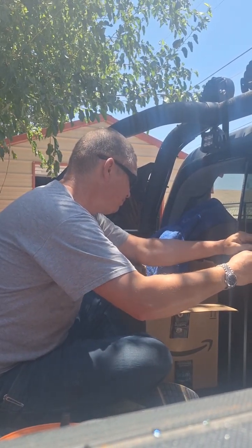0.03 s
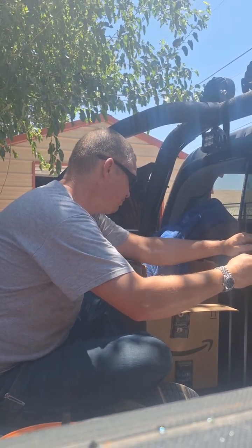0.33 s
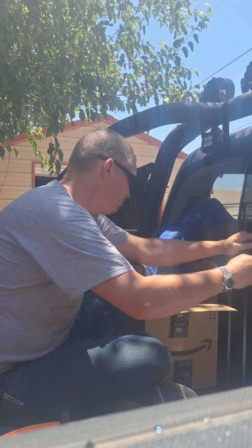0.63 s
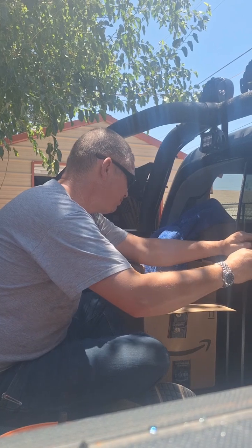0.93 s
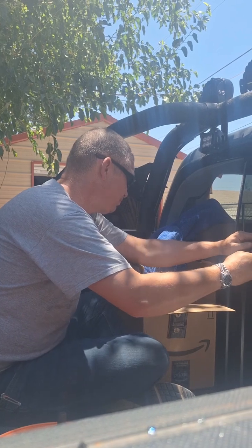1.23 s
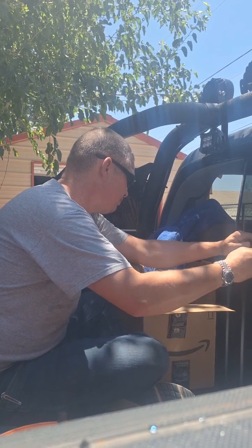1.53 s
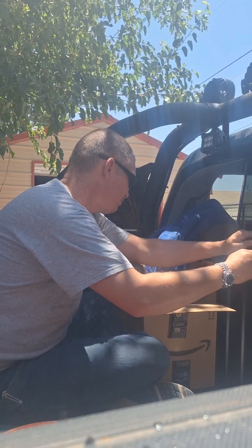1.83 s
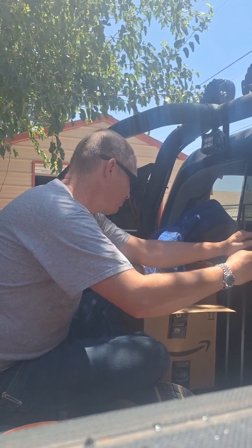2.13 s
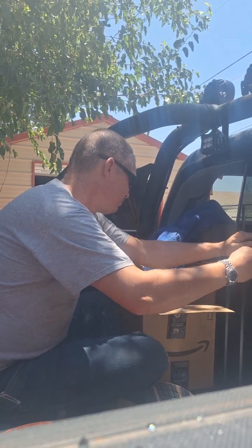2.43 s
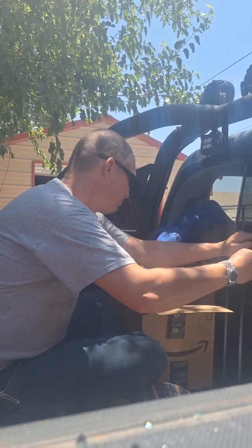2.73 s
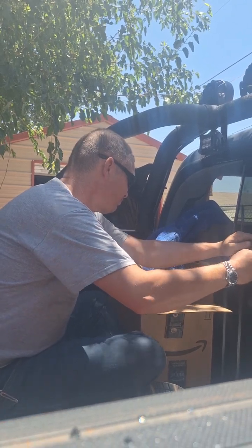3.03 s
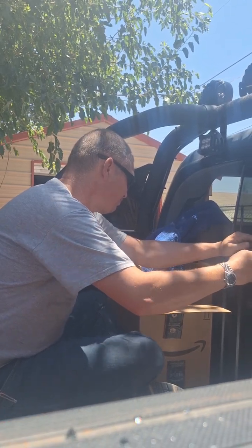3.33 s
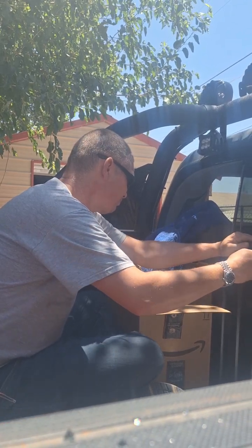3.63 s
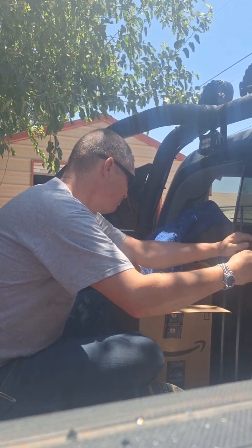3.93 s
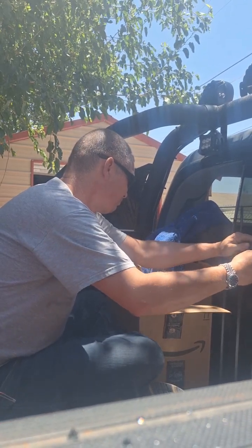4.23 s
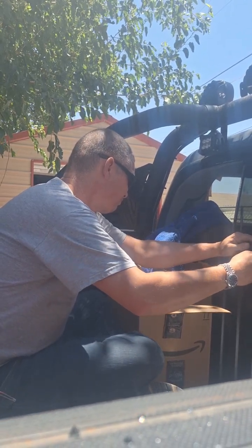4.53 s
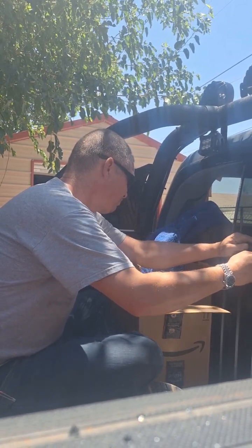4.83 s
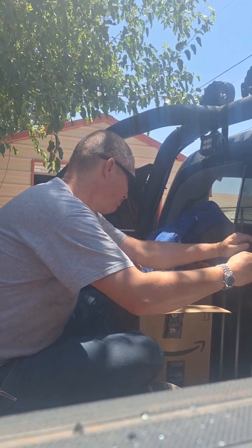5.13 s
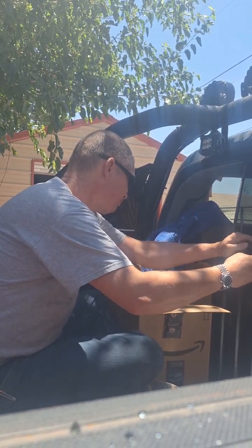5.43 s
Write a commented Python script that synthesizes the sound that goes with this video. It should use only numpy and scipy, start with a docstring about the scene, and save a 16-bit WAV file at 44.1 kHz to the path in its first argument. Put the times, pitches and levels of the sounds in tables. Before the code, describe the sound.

A small hammer knocks broken safety glass out of a vehicle window in a quiet yard. First come small snaps and gritty scrapes, then low gusts buffet the microphone. Steady blows follow, about three a second, crunching the pane and thudding through the metal door and cab. The wind eases partway through, distant birds chirp faintly, and the work ends with softer taps and clicking shards.

```python
"""A small hammer taps shattered safety glass out of a vehicle's window frame, outdoors.
Each blow crunches the pane, knocks the steel door's modes and booms in the air of the cab.
Between blows, shards snap loose and glass scrapes on glass in tiny slips.
Gusts buffet the two microphone ports, and birds whistle far off over a quiet yard."""
import sys
import numpy as np
from scipy import signal
from scipy.fft import rfft, irfft, next_fast_len
from scipy.io import wavfile
from scipy.ndimage import uniform_filter1d, map_coordinates

SR = 44100
rng = np.random.default_rng(int(sys.argv[2]) if len(sys.argv) > 2 else 0)


def dump_mix(stems):
    """Bounce the given channels to the path in sys.argv[1] as a 16-bit WAV at rate SR."""
    frames = np.atleast_2d(stems).T  # one column per channel
    limited = np.clip(frames, -1, 1)  # hard clip at full scale
    pcm = np.round(limited * 32767).astype(np.int16)
    wavfile.write(sys.argv[1], SR, pcm)


N = 250047
T = np.arange(SR // 2) / SR  # seconds within one hit

# tone of the yard's ambience: freq_hz, gain_db
YARD_EQ = [(30, -0.5), (70, 4), (110, -7), (170, -15.5), (260, -10.5), (340, -19), (550, -22), (1000, -22),
           (1600, -30.5), (2100, -34.5), (2800, -47), (4300, -51), (5300, -46), (7000, -55), (13000, -49),
           (16000, -52.5)]
# how alike the ambience is left and right: freq_hz, correlation
YARD_CORRELATION = [(100, 1), (290, 1), (640, 0.51), (1400, 0.038), (3000, 0)]
# rumble of wind on the ports: freq_hz, gain_db
BUFFET_EQ = [(18, -53.5), (32, -6), (48, 3), (90, 5.5), (130, -4), (200, -17), (300, -24.5), (450, -38.5),
             (900, -49), (2000, -82)]
# the right port meets faster, finer eddies: freq_hz, gain_db
WINDWARD_EQ = [(100, 2.5), (200, 5.5), (400, 9.5)]
# gusts, each split between the ports: start_s, length_s, level_db, right_share
GUSTS = [(0, 0.055, -33.5, 0.65), (0.621, .08, -34.5, 0.36), (0.948, 0.047, -27, .5),
         (1.194, .16, -36.5, 0.48), (1.791, 0.15, -25, 0.73), (1.987, 0.079, -16, 0.71),
         (2.188, 0.1, -18, 0.88), (2.486, 0.19, -18.5, .65), (2.713, 0.089, -17.5, 0.24),
         (2.932, 0.13, -21, 0.3), (3.091, 0.1, -21, 0.59), (5.619, 0.043, -30, 0.78)]
# sudden eddies popping at the windward port: centre_s, peak_db, width_s
EDDIES = [(1.87, -14.5, 0.0017), (1.91, -10, 0.0013), (2.04, -13.5, .0015), (2.273, -12.5, 0.0012),
          (2.518, -5, 0.0008), (5.199, -21.5, 0.001), (5.228, -21.5, .0021)]
# shards coming loose: start_s, snap_db, fizz_db, knock_db
SHARDS = [(0.0605, -76, -44.5, -59), (0.2514, -57.5, -40, -46.5), (.283, -46, -31, -58),
          (.2995, -52, -51, -57), (0.5412, -61.5, -47, -45), (0.6127, -69, -42, -64),
          (0.911, -63, -55, -52), (0.936, -58, -46, -48), (1.1509, -59, -50, -47),
          (1.7014, -59.5, -48, -49), (1.7394, -60, -70, -47), (1.829, -66, -54, -51),
          (3.4404, -75, -56, -68), (3.8447, -70.5, -65, -59), (4.213, -71, -59, -72),
          (4.776, -69, -56, -72), (5.064, -68, -53, -72), (5.0894, -65, -49, -55),
          (5.4214, -54.5, -76, -55), (5.4688, -59, -49, -59)]
# decay of the cab's echo: freq_hz, t60_s
CAB_DECAY = [(200, 0.36), (700, 0.18), (1500, 0.17), (5000, 0.18), (14000, 0.13)]
# bright snap of a shard: freq_hz, gain_db
SNAP_EQ = [(600, -5.5), (1500, 4), (2500, 4), (4000, 2), (6000, 2), (8500, -2.5), (11000, -21.5),
           (16000, -35)]
# airy fizz of splinters: freq_hz, gain_db
FIZZ_EQ = [(4000, -65), (7500, -7.5), (9200, -14), (10500, -2.5), (11400, -3.5), (12500, 0.5), (13600, 2.5),
           (14500, -25), (16000, 6.5)]
# modes of the steel door and its frame: pitch_hz, level_db, t60_s
DOOR_MODES = [(148.5, -3, 0.36), (171.9, -3, 0.35), (224.7, -7, 0.32), (265, -2.5, 0.27),
              (309.2, -4.5, 0.21), (391.3, -3.5, 0.17), (426, -2, 0.12), (442.6, 1, 0.091),
              (517.4, -5.5, 0.26), (562, -12.5, 0.12), (586, -4, 0.17), (636.3, -7.5, 0.25),
              (670, -9.5, 0.15), (739.6, -6, 0.12), (770, -5.5, 0.12), (821, -8, 0.16), (875, -9.5, 0.13),
              (909.5, -2.5, 0.041), (1310, -27, 0.055)]
# dull thud under the door's ring: freq_hz, gain_db
THUD_EQ = [(100, -41), (200, 0.5), (300, -4.5), (450, 2), (800, 2.5), (920, -26), (1020, -13),
           (2000, -37.5)]
# a light nudge sounds duller than a blow: freq_hz, gain_db
NUDGE_EQ = [(150, 0), (300, -0.5), (550, 0), (900, -8.5)]
# strokes of glass scraping in the frame: start_s, length_s, level_db
SCRAPE_STROKES = [(.06, 0.054, -58.5), (0.237, .04, -50.5), (0.285, 0.011, -44), (0.374, 0.079, -63.5),
                  (0.521, 0.13, -57.5), (0.92, 0.014, -58.5), (1.008, 0.1, -69.5), (1.727, 0.091, -66),
                  (3.41, 0.064, -66), (4.726, 0.073, -63), (5.07, 0.042, -59.5), (5.21, 0.046, -65),
                  (5.325, 0.083, -63.5), (5.473, 0.0078, -55.5)]
# grit of glass slipping on glass: freq_hz, gain_db
GRIT_EQ = [(800, -57), (2500, -12), (4300, -8.5), (6000, -3.5), (8500, -8.5), (11000, 0), (13000, 4.5),
           (16000, -10.5)]
# hammer blows: start_s, knock_db, boom_db, crack_db, fizz_db, door_body_db
HAMMER_BLOWS = [(1.2136, -39, -32.5, -55, -46, 4.5), (2.4685, -27.5, -23, -40.5, -36, -3.5),
                (2.734, -29.5, -20.5, -40, -34, -5), (2.991, -29.5, -41, -36, -27.5, 2.5),
                (3.26, -27.5, -27.5, -38, -33.5, 3.5), (3.4947, -28.5, -24, -43, -40.5, -5.5),
                (3.7424, -30, -23.5, -43.5, -42.5, -5.5), (4.0492, -27.5, -23, -39.5, -33.5, -5),
                (4.352, -25, -29.5, -34.5, -30.5, 7), (4.6441, -28.5, -33, -38.5, -31.5, 9),
                (5.3756, -41, -64, -52.5, -46, 12), (5.4045, -44.5, -48, -60, -56, 3.5)]
# modes of the cracked pane: pitch_hz, level_db, t60_s
PANE_MODES = [(1306, 7, 0.035), (1402, 3, 0.032), (1907, 2.5, 0.038), (1996, -10, 0.13), (2250, 1.5, 0.023),
              (2690, -16, 0.034), (3520, -7, 0.06), (4130, -12, 0.19), (4460, -15, 0.078),
              (4810, -4.5, 0.044), (5030, -45, 0.05), (6100, -9, 0.074), (7600, -23, 0.066),
              (7850, -18.5, .1)]
# crack of glass under the hammer: freq_hz, gain_db
CRACK_EQ = [(400, -34), (900, 11.5), (1100, 10), (1330, 9), (1650, 5.5), (2050, 4), (2700, 3.5),
            (3200, -2.5), (4400, 1.5), (6000, -5.5), (8000, -12), (11000, -12.5), (16000, -44)]
# modes of the air in the cab: pitch_hz, level_db, t60_s
CAB_MODES = [(52.6, -4.5, 0.29), (82.16, 6.5, 0.28), (102.3, 5, 0.31)]
# bird notes: start_s, length_s, start_hz, middle_hz, end_hz, level_db
BIRD_NOTES = [(1.63, 0.058, 5100, 5720, 5470, -67), (3.415, 0.043, 5780, 5550, 5460, -60.5),
              (3.669, 0.067, 2060, 2460, 3300, -64), (3.779, 0.035, 2990, 2770, 2820, -52.5),
              (3.859, 0.044, 2850, 2860, 2770, -64), (4.152, 0.046, 2040, 2280, 2420, -55),
              (4.29, 0.047, 2600, 2380, 2170, -60.5), (4.597, 0.055, 2240, 2380, 2200, -55.5),
              (4.786, 0.035, 2320, 2260, 2230, -56.5), (5.119, 0.035, 5520, 5670, 5470, -50.5),
              (5.46, .03, 4890, 4950, 5140, -55.5), (5.54, 0.16, 1993, 1938, 1946, -54)]
# the right port's narrow duct resonates, then cancels: freq_hz, gain_db
RIGHT_PORT_EQ = [(100, -1), (1300, -3), (2400, 0), (4400, 1), (5300, 6), (6050, 6), (6700, -1), (7400, -10),
                 (8300, -17), (9300, -9), (10400, -3), (12500, 0), (16000, 0)]


def amp(db):
    """Decibels to gain."""
    return 10 ** (np.asarray(db) / 20)


def unit(x):
    """Scale to rms 1."""
    return x / np.sqrt(np.mean(x ** 2) + 1e-20)


def unit_hit(x):
    """Scale a hit to rms 1 over its first 30 ms."""
    return x / np.sqrt(np.mean(x[..., T < .03] ** 2) + 1e-20)


def along(points, hz):
    """Read (freq_hz, value) points on a log frequency axis."""
    freqs, values = np.transpose(points)
    return np.interp(np.log(hz + 1), np.log(freqs + 1), values)


def wobble(knots_per_s):
    """A smooth random modulation curve."""
    knots = rng.standard_normal(int(N * knots_per_s / SR) + 4)
    return map_coordinates(knots, [np.arange(N) * knots_per_s / SR])


def swell(start_s, length_s, attack_s, release_s):
    """Attack, hold and release; each flank covers 20 dB in its given time."""
    t = np.arange(N) / SR - start_s
    return amp(-20 * (np.maximum(-t, 0) / attack_s + np.maximum(t - length_s, 0) / release_s))


def filtered(x, response):
    """Filter x by a gain that is a function of frequency."""
    n = x.shape[-1]
    padded = next_fast_len(n + 8192)
    return irfft(rfft(x, padded) * response(np.fft.rfftfreq(padded, 1 / SR)), padded)[..., :n]


def eq(x, curve):
    """Shape x with (freq_hz, gain_db) points."""
    return filtered(x, lambda hz: amp(along(curve, hz)))


def add(track, start_s, sound):
    """Mix a sound into a stereo track."""
    start = max(round(start_s * SR), 0)
    part = track[:, start:start + sound.shape[-1]]
    part += sound[..., :part.shape[-1]]


def reverb(x, tail):
    """Convolve x with a stereo tail, scaled to unit energy on the left."""
    return signal.fftconvolve(x, tail / np.linalg.norm(tail[0]), axes=1)[:, :N]


def yard(level_db):
    """A bed of distant traffic and leaves: centred in the bass, wide in the treble."""
    def mid_side_gains(hz):
        width = np.arccos(np.clip(along(YARD_CORRELATION, hz), -1, 1)) / 2
        return amp(along(YARD_EQ, hz)) * [np.cos(width), np.sin(width)]
    mid, side = filtered(rng.standard_normal((2, N)), mid_side_gains)
    return unit(np.array([mid + side, mid - side])) * amp(level_db + 0.11 * wobble(0.73))


def wind(breeze_db, swing_db, shelter_db):
    """Gusts rise out of a breeze and buffet the ports unequally; each eddy gives one push and pull."""
    left, right = rng.standard_normal((2, N)) + 0.69 * rng.standard_normal(N)
    rumble = eq(np.array([left, eq(right, WINDWARD_EQ)]), BUFFET_EQ)
    # level the turbulence, so that breeze and gusts alone set its strength
    rumble /= np.sqrt(np.abs(uniform_filter1d(rumble ** 2, size=SR // 16, axis=1)) + 1e-20)
    strength = amp(breeze_db + swing_db * np.array([wobble(7.9), wobble(4.8)]))
    for start_s, length_s, level_db, right_share in GUSTS:
        gust = amp(level_db) * swell(start_s, length_s, attack_s=0.092, release_s=0.083)
        strength = np.hypot(strength, gust * np.array([[1 - right_share], [right_share]]))
    out = rumble * strength
    for centre_s, peak_db, width_s in EDDIES:
        offset = (np.arange(N) / SR - centre_s) / width_s
        pop = -offset * np.exp((1 - offset ** 2) / 2)
        out += amp([[peak_db + shelter_db], [peak_db]]) * pop  # the left port is sheltered
    return out


def cab_echo(stretch):
    """Stereo noise that dies like the cab's echo, its decay times scaled by stretch."""
    hz, t, bands = signal.stft(rng.standard_normal((2, len(T))), SR, nperseg=256)
    decay = amp(-60 * t / (stretch * along(CAB_DECAY, hz)[:, None]))
    return signal.istft(bands * decay, SR, nperseg=256)[1][:, :len(T)]


def scraping(slips_per_s, spread_db):
    """Each stroke sets off tiny slips of glass on glass, run together by the cab's echo."""
    strokes = [amp(level_db) * swell(start_s, length_s, attack_s=0.051, release_s=0.05)
               for start_s, length_s, level_db in SCRAPE_STROKES]
    pressure = np.max(strokes, axis=0)
    slips = (rng.random(N) < slips_per_s / SR) * rng.choice([-1, 1], N)
    slips = unit(slips * amp(spread_db * rng.standard_normal(N)))
    grit = eq(cab_echo(stretch=.5), GRIT_EQ)
    return reverb((slips * pressure)[None], grit)


def tick(decay_s):
    """The transient of a hard contact, with a peak of 1."""
    click = eq(rng.standard_normal((2, len(T))) * np.exp(-T / decay_s), SNAP_EQ)
    return click / np.abs(click).max()


def burst(tail, curve, rise_s, punch, punch_s):
    """A shaped noise hit: the direct sound punches above its echoes."""
    envelope = (1 - np.exp(-T / rise_s)) * (1 + punch * np.exp(-T / punch_s))
    return unit_hit(eq(tail, curve) * envelope)


def mode_phases(modes):
    """Each mode's starting phase at the two ports: the higher, the less alike."""
    spread = np.minimum(np.transpose(modes)[0][:, None] / 1200, 1.5)
    return rng.uniform(0, 2 * np.pi, (len(modes), 1)) + spread * rng.standard_normal((2, len(modes), 1))


def ringing(modes, phases, scatter_db, rise_s, tilt_db=0):
    """Struck modes ring down, at new strengths for each contact."""
    hz, level_db, t60_s = np.transpose(modes)[:, :, None]
    envelopes = amp(level_db + tilt_db + scatter_db * rng.standard_normal(hz.shape) - 60 * T / t60_s)
    phase_jitter = .5 * rng.standard_normal(hz.shape)
    partials = envelopes * np.sin(2 * np.pi * hz * T + phases + phase_jitter)
    return unit_hit(partials.sum(1) * (1 - np.exp(-T / rise_s)))


def door_knock(body_db, phases):
    """The steel door rings over a dull thud; the struck spot fills or scoops its body near 420 Hz."""
    tilt = lambda hz: body_db * along([(150, -0.39), (420, .5), (600, 0.16), (850, -0.81)], hz)
    mode_hz = np.transpose(DOOR_MODES)[0][:, None]
    ring = ringing(DOOR_MODES, phases, scatter_db=2, rise_s=.002, tilt_db=tilt(mode_hz))
    thud_eq = [(hz, db + tilt(hz)) for hz, db in THUD_EQ]
    thud = burst(cab_echo(stretch=1.0), thud_eq, rise_s=0.0055, punch=0.32, punch_s=0.012)
    return 0.97 * ring + 0.52 * thud


def shards(body_db, tick_over_snap_db):
    """Pieces of glass snap loose, click against each other and nudge the door."""
    out = np.zeros((2, N))
    door_phases = mode_phases(DOOR_MODES)
    for start_s, snap_db, fizz_db, knock_db in SHARDS:
        tail = cab_echo(stretch=0.98)
        snap = burst(tail, SNAP_EQ, rise_s=0.00077, punch=0.47, punch_s=0.00067)
        fizz = burst(tail, FIZZ_EQ, rise_s=0.00026, punch=3.6, punch_s=0.002)
        add(out, start_s, amp(snap_db + tick_over_snap_db) * tick(decay_s=.0015))
        add(out, start_s, amp(snap_db) * snap + amp(fizz_db) * fizz)
        add(out, start_s, amp(knock_db) * eq(door_knock(body_db, door_phases), NUDGE_EQ))
    return out


def pane_ring(detune):
    """The pane loses a few crumbs at every blow, so its modes shift a little."""
    modes = [(hz * (1 + detune * rng.standard_normal()), db, t60_s) for hz, db, t60_s in PANE_MODES]
    return ringing(modes, mode_phases(modes), scatter_db=2.5, rise_s=.001)


def crunch(ring, count, length_s, after_db):
    """The first contact, then smaller fractures as the hammer sinks in; each sets off the same ring."""
    fractures = np.zeros(len(T))
    onsets = (length_s * rng.random(count) * SR).astype(int)
    fractures[onsets] = amp(after_db) * rng.standard_normal(count)
    fractures[0] = 1
    return unit_hit(signal.fftconvolve(ring, fractures[None], axes=1)[:, :len(T)])


def cab_boom(rise_s):
    """Neighbouring air modes start opposed, so the boom swells and then beats."""
    air = sum((-1) ** k * amp(db - 60 * T / t60_s) * np.sin(2 * np.pi * hz * T)
              for k, (hz, db, t60_s) in enumerate(CAB_MODES))
    return unit_hit(air * (1 - np.exp(-T / rise_s)))


def hammer(tick_over_crack_db):
    """Each blow crunches the glass and shakes the door and the cab."""
    out = np.zeros((2, N))
    door_phases = mode_phases(DOOR_MODES)
    shared_echo = cab_echo(stretch=0.92)
    boom = cab_boom(rise_s=0.011) * amp([[1.5], [-1.5]])  # leans left
    for start_s, knock_db, boom_db, crack_db, fizz_db, body_db in HAMMER_BLOWS:
        tail = .5 * shared_echo + cab_echo(stretch=0.89)
        pane = amp(-6) * pane_ring(detune=.015)
        crack = pane + burst(tail, CRACK_EQ, rise_s=0.00064, punch=1.03, punch_s=0.0011)
        fizz = burst(tail, FIZZ_EQ, rise_s=0.0018, punch=2.4, punch_s=0.0028)
        add(out, start_s, amp(crack_db + tick_over_crack_db) * tick(decay_s=0.0013))
        add(out, start_s, amp(knock_db) * door_knock(body_db, door_phases))
        add(out, start_s, amp(boom_db) * boom)
        add(out, start_s, amp(crack_db) * crunch(crack, count=14, length_s=.023, after_db=-19.5))
        add(out, start_s, amp(fizz_db) * crunch(fizz, count=14, length_s=0.015, after_db=-7))
    return out


def house_wall(x, t60_s):
    """A late, diffuse answer from the house."""
    tail = rng.standard_normal((2, len(T))) * amp(-60 * T / t60_s)
    return reverb(x, tail * (1 - np.exp(-T / 0.024)))


def birds(waver, t60_s):
    """Short gliding whistles, heard as scatter from trees and house walls."""
    whistles = np.zeros((2, N))
    for start_s, length_s, start_hz, middle_hz, end_hz, level_db in BIRD_NOTES:
        progress = np.linspace(0, 1, max(int(length_s * SR), 16))
        glide_hz = np.interp(progress, [0, .5, 1], [start_hz, middle_hz, end_hz])
        pitch_hz = glide_hz * (1 + waver * wobble(510)[:len(progress)])
        tone = np.sin(2 * np.pi * np.cumsum(pitch_hz) / SR)
        add(whistles, start_s, amp(level_db) * np.sin(np.pi * progress) * tone)
    scatter = rng.standard_normal((2, len(T))) * amp(-60 * T / t60_s)
    return reverb(whistles, scatter)


def scene():
    """The work on the window up front, with the outdoors around it."""
    work = hammer(tick_over_crack_db=-1.5)
    work += shards(body_db=-2.0, tick_over_snap_db=12)
    work += scraping(slips_per_s=790, spread_db=6.5)
    calls = birds(waver=.025, t60_s=.19)
    reflection = amp(-21.5) * house_wall(work, t60_s=0.36)
    buffeting = wind(breeze_db=-46, swing_db=3.2, shelter_db=-29.5)
    return work + reflection + buffeting + calls + yard(level_db=-45.5)


def record(dry):
    """The right port colours its side; the sub-bass rolls off and the very top is cut steeply."""
    ports = np.array([dry[0], eq(dry[1], RIGHT_PORT_EQ)])
    ports = eq(ports, [(15, -25.0), (28, -5), (42, 0.5)])
    return filtered(ports, lambda hz: 1 / (1 + (hz / 15850) ** 120))


dry = scene()
out = record(dry)
dump_mix(out)
```